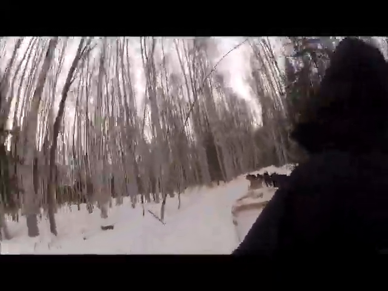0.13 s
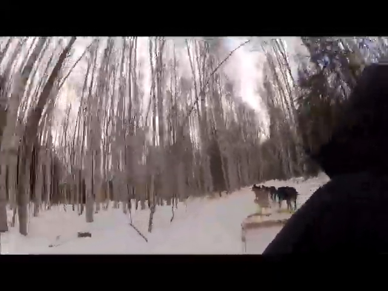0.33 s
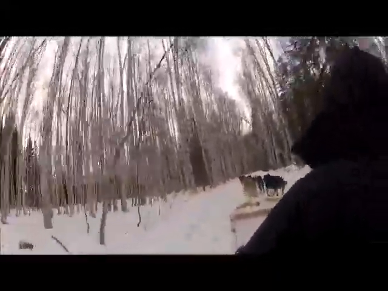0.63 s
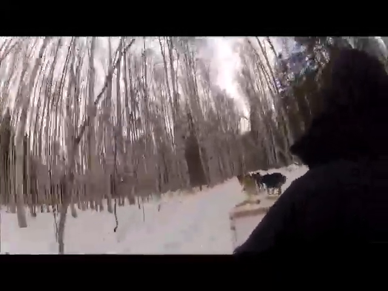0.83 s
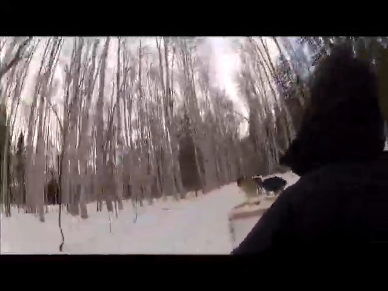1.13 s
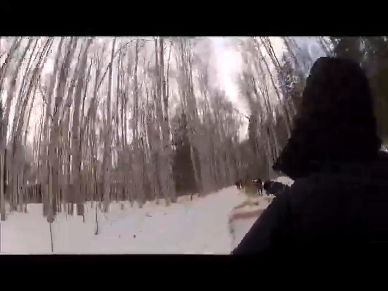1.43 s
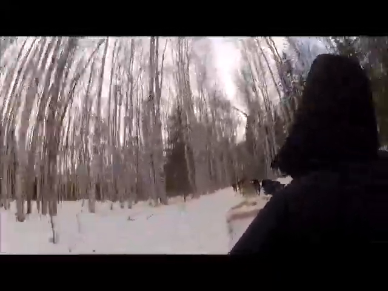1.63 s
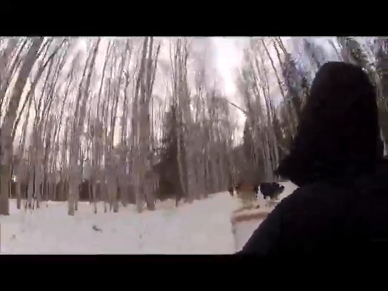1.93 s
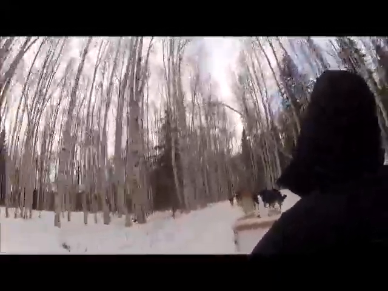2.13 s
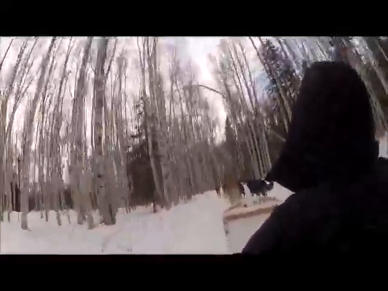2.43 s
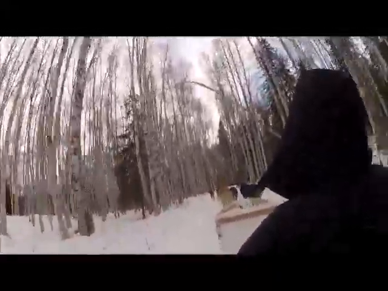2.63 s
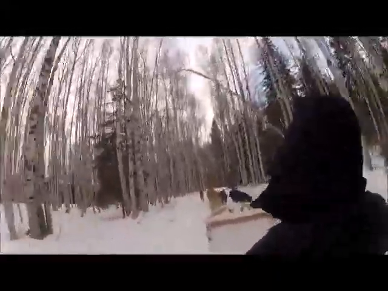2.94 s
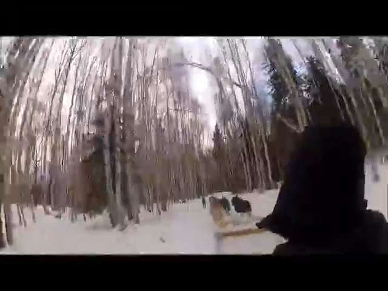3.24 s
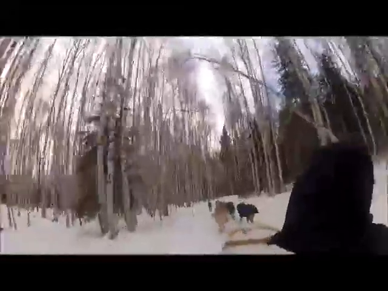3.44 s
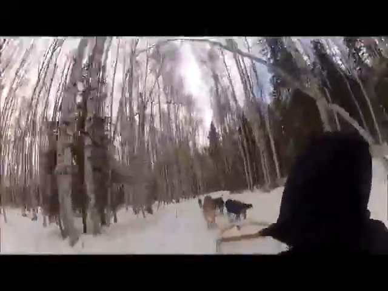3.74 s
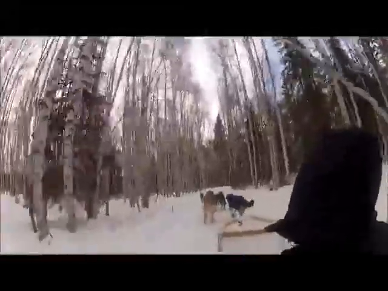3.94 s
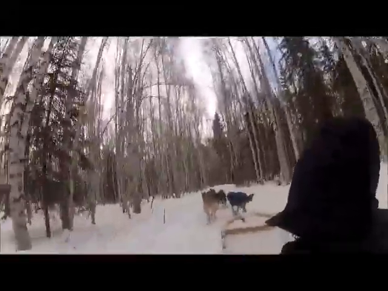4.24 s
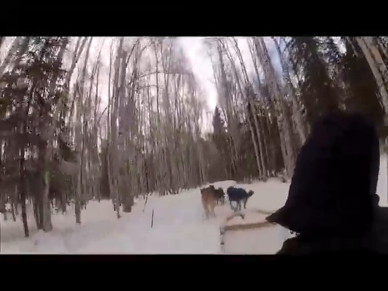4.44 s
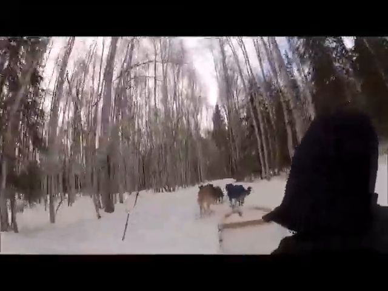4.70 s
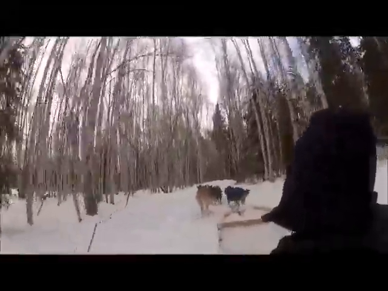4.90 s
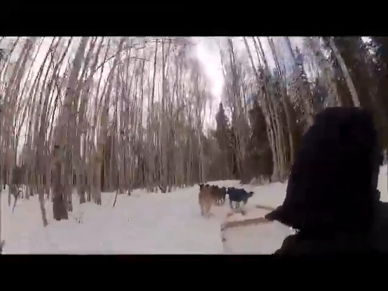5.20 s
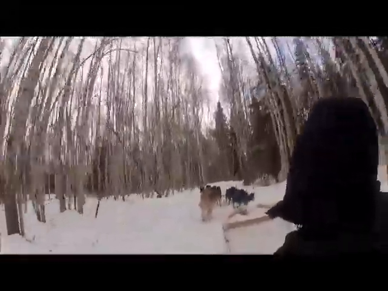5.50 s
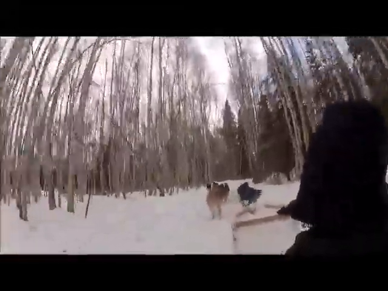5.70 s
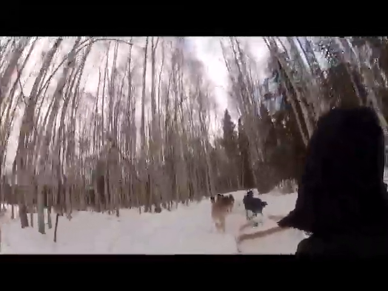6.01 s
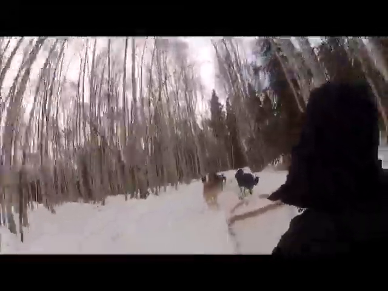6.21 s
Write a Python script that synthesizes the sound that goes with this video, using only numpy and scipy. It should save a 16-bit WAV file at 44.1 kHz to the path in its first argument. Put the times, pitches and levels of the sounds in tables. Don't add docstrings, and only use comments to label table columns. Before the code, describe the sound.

Outdoors on packed snow, a sled's frame drones and rings in an uneven low rumble, swelling with every tug of the line. Wooden bumps and loose slat raps punctuate it, with occasional faint icy ticks and brittle crust snaps. A solid bang comes around one second, heavier ones in the middle and near the end. The enclosed microphone is very close, muffled, with coarse low-quality treble and no echo.

```python
import sys
import numpy as np
from scipy import signal
from scipy.fft import rfft, irfft, next_fast_len
from scipy.io import wavfile

SR = 44100
rng = np.random.default_rng(int(sys.argv[2]) if len(sys.argv) > 2 else 0)


def elevation(decibels):
    levels = np.asarray(decibels, float)
    return 10 ** (levels / 20)


def put_to_file(sound):
    columns = np.atleast_2d(sound).T
    safe = np.clip(columns, -1, 1)
    whole_steps = np.round(safe * 32767)
    wavfile.write(sys.argv[1], SR, whole_steps.astype(np.int16))


N = 280476


# (time [s], speed as snow hiss [dB], unevenness of the trail [dB])
TRAIL = [(0.0, -56, 4.5), (0.26, -58.5, 4), (1.1, -54.5, -0.5), (2.23, -58.5, 1), (2.57, -53.5, -2.5),
         (2.73, -54, -3), (3.63, -60.5, 1), (4.25, -55, -4), (4.48, -60, 3.5), (5.08, -60, 5.5),
         (5.31, -59, -1.5), (5.69, -58, 3.5), (5.88, -54, 4.5), (6.36, -58.5, 5.5)]
CROSSOVER_HZ = [100, 370, 1550]
# (level at mean speed [dB], share of speed [0-1], of unevenness [ratio], of a tug [0-1])
REGION_MIX = [
    (-43.5, .3, 1.1, 0.16),
    (-39, 1, .4, 1),
    (-40, 0.39, .15, 0.94),
    (-57, 0.77, .05, 0.55),
]


def glide():
    time, speed_db, uneven_db = np.transpose(TRAIL)
    t = np.arange(N) / SR
    speed_db = np.interp(t, time, speed_db - speed_db.mean())
    uneven_db = np.interp(t, time, uneven_db)
    load = drift(28.0)
    pull_db = tugs()
    edges_hz = [12, *CROSSOVER_HZ, 7000]
    # (grains per s, grain share, shared sway dB, own sway dB)
    textures = [(64.3, 0.067, 0.28, 1.73), (212.0, 0.4, 0.82, 0.26),
                (490, 0.37, 0.39, 1.1), (2600, 0.26, 0.92, 0.54)]
    out = np.zeros(N)
    for k, (per_s, share, sway_db, own_db) in enumerate(textures):
        friction = np.sqrt(1 - share) * rng.standard_normal(N)
        judder = np.sqrt(share) * grains(per_s, spread_db=1.0)
        base_db, by_speed, by_trail, by_tug = REGION_MIX[k]
        level_db = base_db + by_speed * speed_db + by_trail * uneven_db + by_tug * pull_db[k]
        level_db = level_db + sway_db * load + own_db * drift(22.5)
        out += elevation(level_db) * through_sled(friction + judder, edges_hz[k], edges_hz[k + 1])
    return out


# (time [s], hold [s], lift [dB],
# share that reaches slats and snow [0-1])
TUGS = [(0.1, 0.046, 5, .6), (0.327, 0.13, 9, 0.43), (0.513, 0.047, 6.5, 0.27), (0.62, 0.024, 5, 0.3),
        (0.799, 0.16, 7, 0.3), (0.973, 0.25, 8.5, 0.56), (1.285, 0.076, 4.0, 0.85),
        (1.44, 0.064, 9.5, 0.03), (1.6, 0.037, 1, .8), (1.847, 0.11, 9, 0.3), (2.266, 0.18, 6, 0.12),
        (2.58, 0.09, 3, 0.2), (2.715, 0.087, 11.5, 0.22), (2.974, 0.038, 1, 1), (3.098, 0.046, 3.5, 0.3),
        (3.275, 0.17, 8.5, 0.37), (3.428, 0.032, 10.5, 0.54), (3.613, 0.023, 2, 1), (3.84, 0.095, 9, 0.5),
        (4.082, 0.096, 3, 1), (4.37, 0.041, 4.5, 0.75), (4.668, 0.12, 8.0, 0.16), (5.186, 0.1, 8.5, 0.02),
        (5.664, 0.036, 8.5, 0.5), (5.843, 0.037, -1.5, 0.9), (5.946, 0.031, -4, 0.7), (6.086, .15, 7, 0.25)]
# (time [s], length [s], dip [dB])
LULLS = [
    (0.204, 0.039, 2.5),
    (1.737, 0.11, 1),
    (2.104, 0.18, 1.5),
    (3.509, 0.078, 5.5),
    (3.655, 0.058, 2.5),
    (4.02, 0.044, 1),
    (4.554, .1, -0.5),
    (5.015, 0.14, 3),
    (5.416, 0.25, 0.5),
    (6.27, .05, -0.5),
]


def tugs():
    attack_s, release_s = 0.039, 0.052
    t = np.arange(N) / SR
    low, high, lull = np.zeros(N), np.zeros(N), np.zeros(N)
    for s, hold, lift_db, share in TUGS:
        rise = (t - s) / attack_s + .5
        fall = (s + hold - t) / release_s + 1
        shape = np.clip(np.minimum(rise, fall), 0, 1)
        low = np.maximum(low, lift_db * shape)
        high = np.maximum(high, share * lift_db * shape)
    for s, length, dip_db in LULLS:
        inside = np.minimum(t - s, s + length - t)
        lull += dip_db * np.clip(inside / attack_s + .5, 0, 1)
    return low - lull, low - lull, high - lull, high - 1.5 * lull


# (frequency [Hz], level [dB])
HOUSING_COLOUR = [(12, -24), (20, -13), (48, -4.5), (85, -3), (125, -3), (162, 2.5), (287, -1.5),
                  (373, -2.5), (601, -4.5), (859, -19.5), (1480, -37.5), (2760, -32), (4330, -48),
                  (5360, -46), (5900, -52.5), (7670, -84.5), (13000, -120)]
# (frequency [Hz], width [Hz], peak [dB])
RESONANCES = [(132, 12, 9.5), (197, 29, 0.5), (229.6, 30, 5.5), (286, 28, 7), (508, 34, 2), (588, 126, 2.5),
              (1296, 130, 2.5), (1640, 175, -4.5), (1840, 190, 2.5), (2670, 600, 3), (3740, 370, 7)]


def through_sled(force, low_hz, high_hz):
    size = next_fast_len(N)
    hz = np.arange(size // 2 + 1) * SR / size + 1e-3
    points = np.array(HOUSING_COLOUR)
    db = np.interp(np.log(hz), np.log(points[:, 0]), points[:, 1])
    for centre_hz, width_hz, peak_db in RESONANCES:
        db = db + peak_db / (1 + (2 * (hz - centre_hz) / width_hz) ** 2)
    edges = 1 / np.sqrt((1 + (low_hz / hz) ** 8) * (1 + (hz / high_hz) ** 8))
    return rms_one(irfft(rfft(force, size) * elevation(db) * edges, size)[:N])


def grains(per_s, spread_db):
    sizes = elevation(spread_db * np.minimum(rng.exponential(1, N), 4))
    signs = rng.choice([-1, 1], N)
    return rms_one(sizes * signs * (rng.random(N) < per_s / SR))


def drift(rate):
    r = np.exp(-40 * np.pi * rate / SR)
    noise = rng.standard_normal(N // 20 + 2002)
    slow = signal.lfilter([1], [1, -2 * r, r * r], noise)[2000:]
    return np.interp(np.arange(N) / 20, np.arange(len(slow)), rms_one(slow))


def rms_one(x):
    return x / np.sqrt(np.mean(x ** 2) + 1e-20)


# (time [s],
# peak [dB], frequency [Hz], length [s])
SLAMS = [(.9745, -9, 282, .017), (.9851, -12.5, 282, .02), (1.6122, -14, 380, .008), (3.38, -20, 45, .05),
         (5.675, -24, 60, .04), (6.135, -25, 55, .045), (2.77, -22, 290, .05), (2.772, -22, 595, .045),
         (2.772, -21, 140, .055), (3.376, -15, 130, .011), (3.3845, -6, 165, .0075),
         (3.394, -11.5, 145, .017), (6.1275, -20, 210, .011), (6.1357, -.5, 180, .0145),
         (6.1455, -12.5, 105, .024)]


def slams():
    out, t = np.zeros(N), np.arange(N) / SR
    for s, peak_db, hz, length in SLAMS:
        swell = np.sin(np.pi * np.clip((t - s) / length, 0, 1)) ** 2
        out += elevation(peak_db) * swell * np.sin(2 * np.pi * hz * (t - s))
    return out


# (time [s], peak [dB], ring [Hz], t60 [s])
KNOCKS = [(0.087, -16, 147, 0.23), (0.392, -8.5, 220.5, 0.092), (0.515, -19, 238, 0.21),
          (0.824, -22, 310, 0.071), (0.861, -12, 217, 0.09), (0.988, -6, 282, 0.072),
          (1.097, -13.5, 313, 0.092), (1.149, -20, 201, 0.098), (1.19, -14, 286, 0.19),
          (1.844, -15, 123, 0.063), (2.039, -16.5, 274, 0.064), (2.33, -18, 250.4, 0.28),
          (2.382, -9.5, 211, 0.073), (2.53, -14, 249, 0.065), (2.634, -12.5, 207, 0.062),
          (2.673, -12.5, 204, 0.038), (2.729, -16.5, 277, 0.15), (2.804, -17, 279, 0.13),
          (3.442, -14, 217, 0.044), (3.847, -15, 277, 0.12), (3.887, -11, 294.4, 0.08),
          (4.396, -15.5, 292, 0.073), (4.707, -14.5, 290, 0.088), (5.198, -18, 259, 0.086),
          (5.289, -20.5, 248, 0.094), (5.685, -19, 99, 0.048), (5.696, -12, 132, 0.087),
          (5.957, -27, 196, 0.08), (6.159, -11, 129, 0.099), (6.33, -14.5, 293, 0.069)]


def knocks():
    return elevation(-9.0) * blows(KNOCKS, rise_cycles=0.53, partner_ratio=2.05, partner_db=-12, rough=.002)


# (time [s], peak [dB], ring [Hz])
RAPS = [(0.18, -21, 457), (.389, -32, 490), (.524, -23.5, 407), (0.621, -27, 398), (.86, -24, 557),
        (.982, -14.5, 570), (1.101, -19.5, 550), (1.221, -22.5, 584), (1.651, -25.5, 481),
        (1.843, -29.5, 423), (2.275, -37, 600), (2.417, -26.5, 506), (2.595, -27, 598), (2.73, -24.5, 550),
        (2.752, -19.5, 614), (2.871, -23, 449), (2.981, -23.5, 556), (3.084, -25.5, 548), (3.44, -29, 480),
        (3.499, -26.5, 567), (3.721, -30, 370), (3.851, -21, 431), (4.245, -23, 498), (4.354, -31, 507),
        (4.458, -30, 530), (4.806, -25, 563), (4.832, -26.5, 558), (5.292, -30, 408), (6.089, -26, 555),
        (6.14, -18.5, 447)]


def raps():
    t60 = 0.074
    table = [(*rap, t60) for rap in RAPS]
    return elevation(-5) * blows(table, rise_cycles=0.31, partner_ratio=0.552, partner_db=-4.5, rough=.002)


# (time [s], peak [dB])
TICKS = [(.164, -43.5), (.4404, -52), (0.5256, -54), (0.633, -52), (.885, -53), (0.978, -36), (1.1054, -45),
         (1.13, -45), (1.6112, -48), (2.0561, -38), (2.75, -51), (3.334, -53), (3.3794, -45), (3.812, -52),
         (3.954, -54), (5.684, -49), (5.7647, -45), (5.959, -42), (6.126, -49)]


def ticks():
    ring_hz, t60 = 2700, 0.031
    table = [(*tick, ring_hz, t60) for tick in TICKS]
    struck = blows(table, rise_cycles=1.5, partner_ratio=.9, partner_db=-7, rough=.35)
    return signal.sosfilt(signal.butter(2, [1100, 4800], "band", fs=SR, output="sos"), struck)


def blows(table, rise_cycles, partner_ratio, partner_db, rough):
    out, t = np.zeros(N + SR // 4), np.arange(SR // 4) / SR
    for s, peak_db, hz, t60 in table:
        rattle = rough * rng.standard_normal(len(t))
        shape = (1 - np.exp(-t * hz / rise_cycles)) * elevation(-60 * t / t60)
        mode = -np.sin(2 * np.pi * hz * t)
        partner = elevation(partner_db) * np.sin(2 * np.pi * hz * partner_ratio * t)
        i = int((s + 0.001) * SR)
        out[i:i + len(t)] += elevation(peak_db) * shape / shape.max() * (mode + partner + rattle)
    return out[:N]


# (time [s], peak [dB], lowest [Hz], highest [Hz], t60 [s])
SNAPS = [(.1645, -41, 2300, 4100, .024), (.976, -44, 1100, 3900, .09), (1.101, -36, 1900, 2700, .03),
         (1.101, -39, 1050, 1400, .03), (2.056, -50, 1850, 2150, .05), (3.0295, -41, 850, 1500, .03),
         (3.379, -42, 1500, 3300, .07), (3.445, -44, 900, 2200, .03), (5.9585, -38, 2000, 6500, .022),
         (6.127, -46, 1900, 3200, .03), (6.138, -36, 850, 1200, .04), (.35, -54, 1600, 3600, .15),
         (1.61, -47, 1000, 3200, .04), (3.955, -47, 1050, 1450, .06)]


def snaps():
    out, t = np.zeros(N + SR // 10), np.arange(SR // 10) / SR
    for s, peak_db, low_hz, high_hz, t60 in SNAPS:
        band = signal.butter(3, [low_hz, high_hz], "band", fs=SR, output="sos")
        force = rng.standard_normal(len(t))
        force[round(.0015 * SR)] += 7.0
        burst = rms_one(signal.sosfilt(band, force))
        i = int(s * SR)
        out[i:i + len(t)] += elevation(peak_db - 60 * t / t60) * np.minimum(t / 0.0023, 1) * burst
    return out[:N]


def scene():
    mix = glide() + slams() + knocks() + raps() + ticks() + snaps()
    return np.tile(mix, (2, 1))


# (time [s], length [s], share lost [0-1])
STARVED = [
    (1.585, .016, .9),
    (1.692, .012, .8),
    (2.29, .014, .82),
    (4.295, .014, .8),
    (5.905, .028, 1.0),
    (6.28, .011, .92),
]
# (lowest [Hz], highest [Hz])
KEPT_BANDS_HZ = [(15, 950), (1070, 1110), (1760, 1840), (2150, 3000), (3650, 3900), (9100, 9500),
                 (11200, 12800)]


def starve(x):
    kept, gate, t = np.zeros(N), np.zeros(N), np.arange(N) / SR
    for band in KEPT_BANDS_HZ:
        kept += signal.sosfiltfilt(signal.butter(4, band, "band", fs=SR, output="sos"), x)
    for s, length, lost in STARVED:
        gate += lost * np.clip((length / 2 - abs(t - s)) / 0.003 + 1, 0, 1)
    return x + gate * (kept - x)


def low_pass(x):
    return signal.sosfilt(signal.butter(12, 16610, fs=SR, output="sos"), x)


def record(dry):
    self_noise_db, anti_alias_hz, overload, cutoff_hz = -69, 6400, .5, 15230
    sensed = dry[0] + elevation(self_noise_db) * rng.standard_normal(N)
    sensed = signal.sosfiltfilt(signal.butter(14, anti_alias_hz, fs=SR, output="sos"), sensed)
    coarse = signal.resample_poly(sensed, up=40, down=147)
    coarse = np.clip(coarse, -overload, overload)
    held = np.repeat(coarse, 4)
    held = signal.resample_poly(held, up=147, down=160)[:N]
    held = starve(np.pad(held, (0, N - len(held))))
    held = signal.sosfilt(signal.ellip(8, .2, 30, cutoff_hz, fs=SR, output="sos"), held)
    return low_pass(np.tile(held, (2, 1)))


dry = scene()
out = record(dry)
put_to_file(out)
```